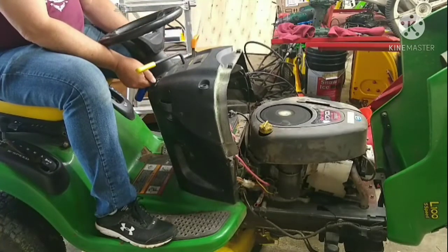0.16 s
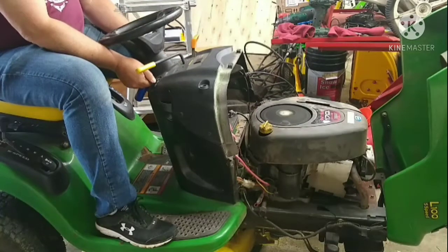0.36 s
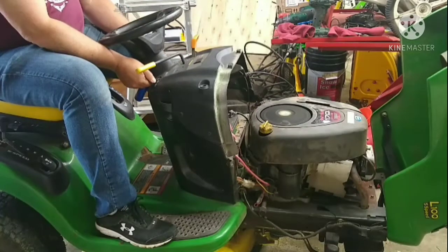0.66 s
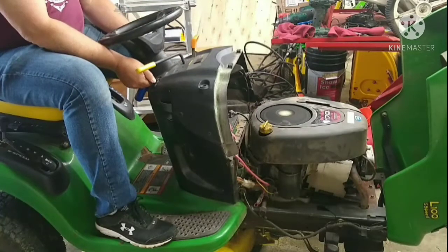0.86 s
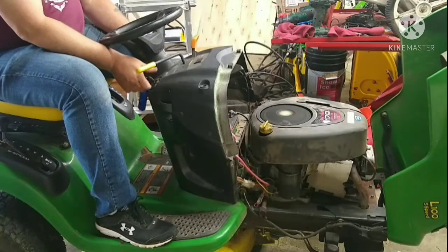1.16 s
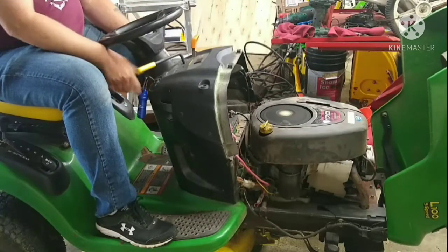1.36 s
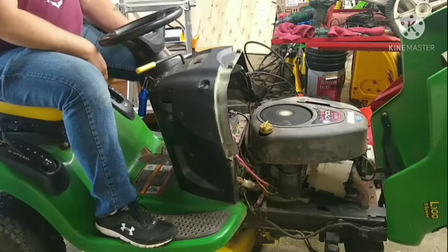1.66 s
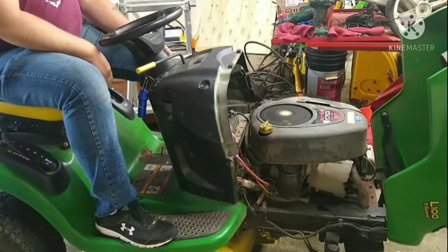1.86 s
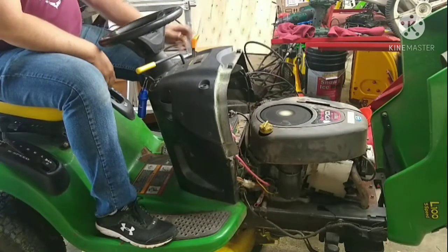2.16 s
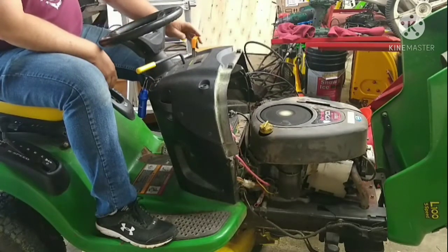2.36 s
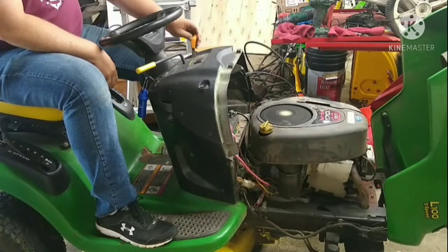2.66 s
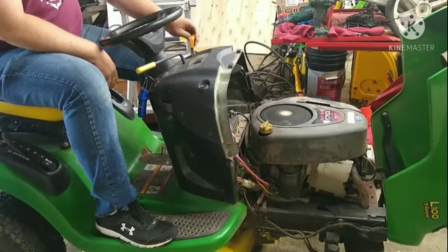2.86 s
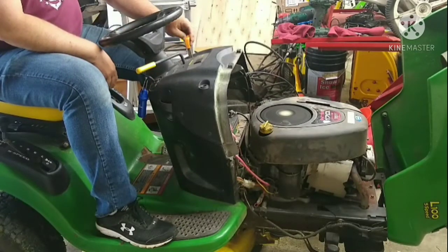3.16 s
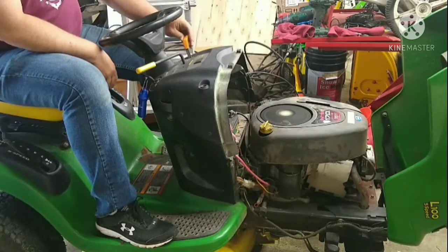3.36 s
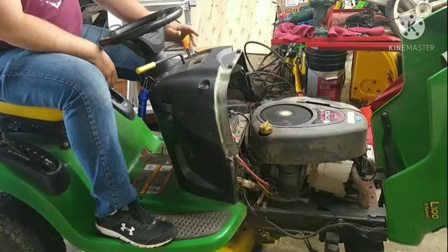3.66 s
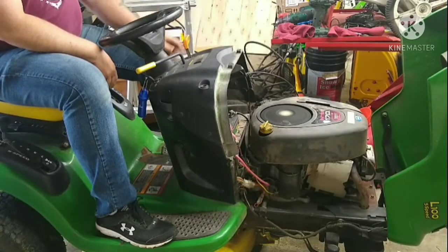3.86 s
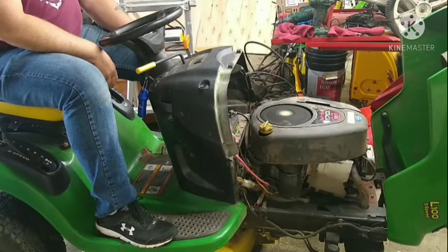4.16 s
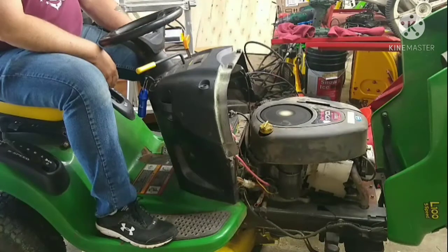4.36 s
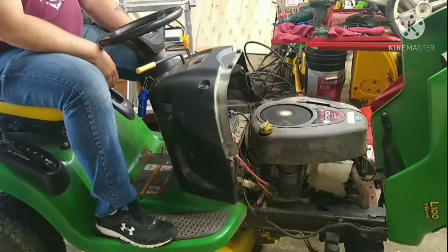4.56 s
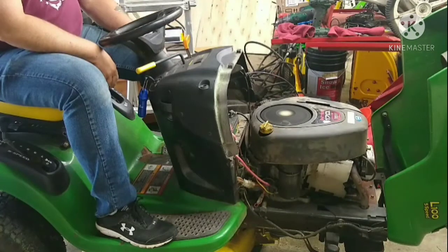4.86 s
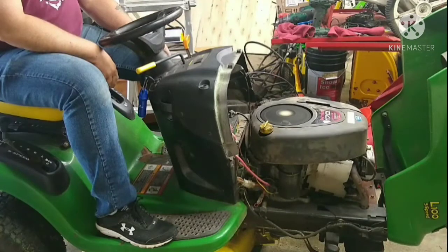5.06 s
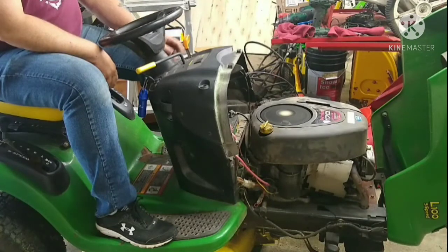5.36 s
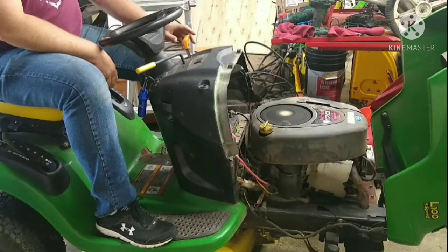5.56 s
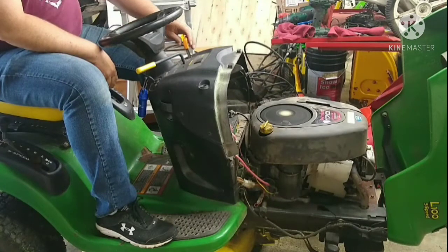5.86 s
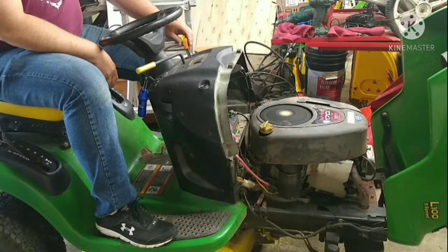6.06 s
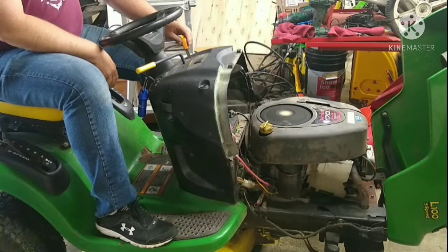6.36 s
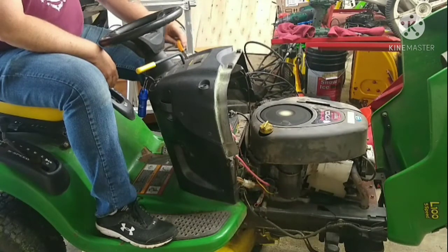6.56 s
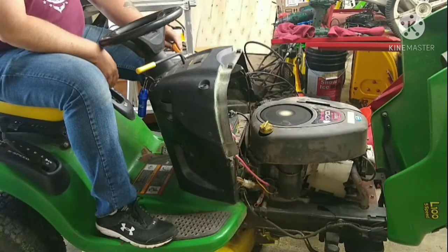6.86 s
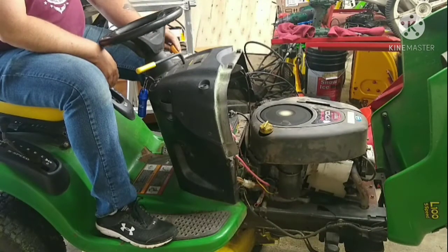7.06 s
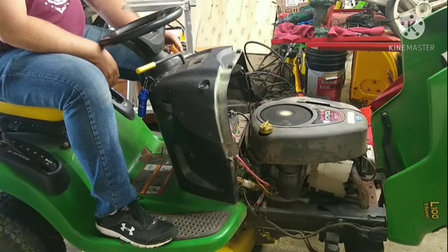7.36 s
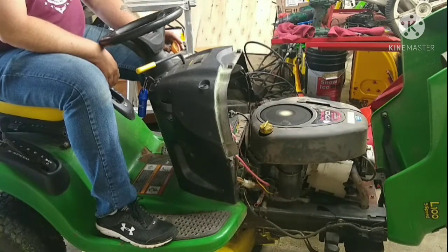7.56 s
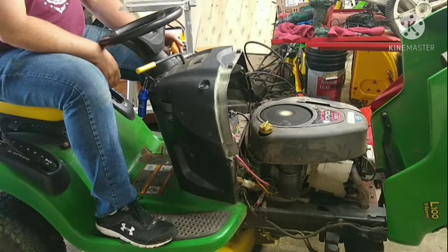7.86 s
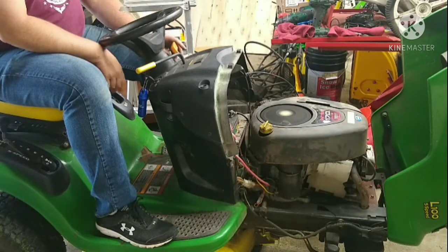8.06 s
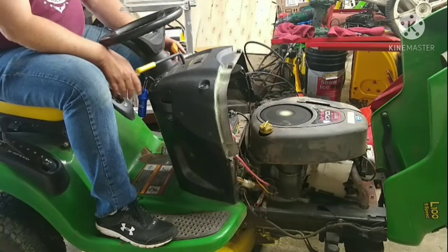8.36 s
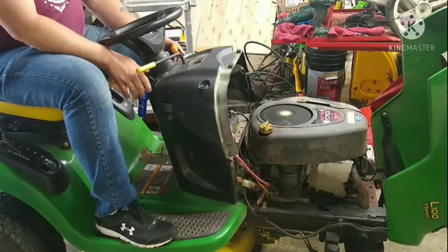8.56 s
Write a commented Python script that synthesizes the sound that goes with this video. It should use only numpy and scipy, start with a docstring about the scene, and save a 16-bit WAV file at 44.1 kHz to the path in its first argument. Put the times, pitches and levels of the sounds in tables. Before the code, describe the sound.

A riding mower's small petrol engine cranks with a whining, chugging starter, catches after a second, roars steadily, then eases down to a slower putter.

```python
"""A riding mower's single-cylinder four-stroke is cranked in a garage, catches, runs fast, is throttled back.
Starter noise, its tooth whine, intake gulps, hoots, puffs, bangs and chassis thumps make the start.
Firing pulses ring the muffler and the room; shaped noise makes cooling air, intake drone and exhaust hiss.
Sine multiples of the firing rate make the fan and crankshaft song; short ringing ticks make the tappets.
A phone close by picks it up with two microphones and widens the stereo image."""
import sys
import numpy as np
from scipy import signal
from scipy.fft import rfft, irfft, next_fast_len
from scipy.io import wavfile
from scipy.ndimage import map_coordinates

SR = 44100
rng = np.random.default_rng(int(sys.argv[2]) if len(sys.argv) > 2 else 0)


def digitize_waveform(pressure):
    """Quantize a signal to 16-bit integers and store it at the path in sys.argv[1].

    Rows of a 2-D input are taken as channels; values are limited to [-1, 1].
    """
    field = np.atleast_2d(pressure).T
    bounded = np.clip(field, -1, 1)
    quanta = np.round(bounded * 32767).astype(np.int16)
    wavfile.write(sys.argv[1], SR, quanta)


N = 384111
TIME = np.arange(N) / SR
SIZE = next_fast_len(N + SR // 2, real=True)
HZ = np.fft.rfftfreq(SIZE, 1 / SR)

# engine speed: (time [s], rate [firings/s])
SPEED = [(1.136, 13.0), (1.42, 24.77), (1.6, 25.5), (1.82, 25.24), (2.0, 25.3), (2.45, 25.0), (2.74, 25.14),
         (3.22, 25.08), (3.45, 25.84), (3.72, 26.32), (4.08, 26.28), (4.25, 25.96), (4.58, 26.29),
         (4.75, 25.91), (5.1, 26.27), (5.5, 26.1), (5.78, 25.38), (5.93, 25.68), (6.2, 25.6), (6.4, 25.76),
         (6.78, 25.69), (7.05, 23.68), (7.3, 22.28), (7.6, 21.1), (8.17, 19.99), (8.71, 19.8)]
# throttle: (time [s], opening [0-1])
THROTTLE = [(1.4, 0.89), (6.75, 0.89), (7.0, 0.47), (8.7, 0)]
# engine load: (time [s], load [0-1])
LOAD = [(1.5, 0.8), (3.3, 0.64), (3.65, 0.34), (5.65, 0.45), (5.95, 0.8), (6.6, 0.5), (6.95, 0)]
# intake strokes through the carburettor: (time [s], peak [dB], length [s], boom [Hz])
GULPS = [(.024, -17.5, 0.016, 424), (.219, -19.5, 0.013, 532), (.399, -16, 0.011, 466),
         (.566, -17, 0.015, 375), (.728, -14.5, 0.01, 363), (.889, -15.5, 0.012, 385),
         (1.013, -12, 0.0067, 540), (1.109, -14.5, 0.0049, 494), (1.157, -17, .002, 520),
                  (1.185, -13.5, 0.019, 415), (1.229, -19, .004, 402), (1.28, -18, 0.0079, 430),
         (1.333, -12.5, 0.0031, 445), (1.378, -11.5, 0.0078, 420), (1.415, -17, 0.0054, 400),
         (1.452, -25, 0.0033, 380), (1.488, -21, 0.0051, 380)]
# spits back through the carburettor with loss of power: (time [s], peak [dB], sag [dB])
STUMBLES = [(5.743, -12.5, 4), (6.563, -13, .5)]
# first firings: (time [s], peak [dB], 60 dB decay [s], muffler cut-off [Hz], exhaust puff [dB])
BANGS = [(.933, -23, 1.2, 130, -25.5), (1.014, -19, .18, 2500, -31.5)]

# resonances and hollows of muffler, chassis and garage: (frequency [Hz], width [Hz], gain [dB])
BODY_MODES = [(126.0, 12.0, 8.0), (176.0, 9.0, -9.0), (222.0, 16.0, 14.0), (228.0, 34.0, -11.0),
              (260.0, 27.0, 13.0), (306.0, 15.0, 9.0), (356.0, 40.0, 14.0), (426.0, 67.0, 14.0),
              (521.0, 28.0, 14.0), (571.0, 25.0, 11.0), (620.0, 14.0, 5.0), (639.0, 11.0, 9.0),
              (701.0, 70.0, 14.0), (820.0, 21.0, -8.0), (893.0, 60.0, 9.0), (911.0, 28.0, -12.0),
              (942.0, 15.0, 4.0), (999.0, 25.0, -12.0), (1005.0, 12.0, 14.0), (1031.0, 9.0, 6.0),
              (1070.0, 36.0, -7.0), (1210.0, 9.0, 5.0), (1246.0, 20.0, -6.0), (1469.0, 9.0, 4.0),
              (1569.0, 55.0, 7.0), (1624.0, 9.0, 5.0), (1678.0, 15.0, 4.0), (1855.0, 68.0, 8.0)]
# starter gear resonances: (frequency [Hz], width [Hz], gain [dB])
GEAR_MODES = [(696, 35, 7), (910, 170, 5), (1186, 110, 5.5), (2780, 670, -5.5), (5330, 300, 1.5)]
# intake air box resonances: (frequency [Hz], width [Hz], gain [dB])
AIRBOX_MODES = [(160, 45, 5), (385, 120, 10), (545, 60, 5)]
# fan shroud resonances: (frequency [Hz], width [Hz], gain [dB])
SHROUD_MODES = [(681, 77, 8), (1215, 110, 4.5), (3200, 2600, -1), (5720, 570, -5.5)]
# resonances that swell passing tones: (frequency [Hz], width [Hz], gain [dB])
TONE_MODES = [(326, 20, -34.5), (422, 121, -36.6), (526, 18, -28.2), (569, 33, -32.1), (639, 16, -27.9),
              (700, 47, -28.0), (743, 14, -30.2), (860, 48, -31.5), (892, 10, -32.5), (953, 17, -32.8),
              (1009, 23, -36.7), (1120, 53, -33.5), (1187, 22, -35.5), (1210, 6, -29.9), (1285, 20, -37)]

# firing spectrum: (frequency [Hz], relative level [dB/Hz])
FIRING_SPECTRUM = [(25, -72), (40, -60), (55, -38.5), (80, -47), (110, -30.5), (200, -39.5), (350, -47),
                   (700, -48.5), (1200, -38.5), (1500, -48.5), (2000, -50), (3200, -60), (4200, -67.5),
                   (6000, -67), (16000, -103)]
# cooling air spectrum: (frequency [Hz], relative level [dB/Hz])
RUSH_SPECTRUM = [(20, -26), (50, -7), (190, -11), (280, -1), (600, -1.5), (900, -1), (1700, -2), (2400, -6),
                 (4200, -13.5), (6500, -14.5), (8000, -24), (16000, -17)]
# exhaust hiss and valve spectrum: (frequency [Hz], relative level [dB/Hz])
HISS_SPECTRUM = [(500, -32), (2500, -1), (5000, 10.5), (8000, 0.5), (10000, 2.5), (12500, 2.5),
                 (15500, -14)]
# starter grind spectrum: (frequency [Hz], relative level [dB/Hz])
GRIND_SPECTRUM = [(25, -14), (60, 6), (150, -3), (270, 6), (800, -7), (1400, -3), (2200, -0.5),
                  (4200, -8.5), (6500, -13.5), (8000, -21), (16000, -19)]
# gulp spectrum: (frequency [Hz], relative level [dB/Hz])
GULP_SPECTRUM = [(40, -26), (130, 5), (400, -5.5), (650, -6), (1300, -19), (4000, -29), (16000, -62)]
# sharp puff spectrum: (frequency [Hz], relative level [dB/Hz])
PUFF_SPECTRUM = [(500, -30), (2500, -13), (4200, 9.5), (5500, 11), (8000, 4), (10000, 4.5), (12500, 7),
                 (15500, 1)]
# exhaust note change, throttle shut: (frequency [Hz], gain [dB])
SHUT_CHANGE = [(60, 1), (120, 3.5), (190, 12), (270, -4.5), (400, 3), (650, -4.5), (900, -1.5), (1180, -4),
               (1400, 0)]
# exhaust note change, no load: (frequency [Hz], gain [dB])
UNLOADED_CHANGE = [(60, 1.5), (125, -2.5), (175, -3), (260, 2), (380, -15), (550, 0), (1200, 3)]

# starter tooth tones: (multiple of mesh rate [-], level [dB])
WHINE = [(3, -43.5), (4, -42), (5, -40.5), (6, -47)]
# fan and crankshaft tones: (multiple of firing rate [-], level unloaded [dB], change at full load [dB])
TONES = [(14, 5, 4), (16, 2, -6), (17, -6, 9), (18, -3.1, 0), (20, -2, 0), (22, -3.2, 0), (24, -4.5, 0),
         (26, -6.5, 0), (27, -20, 19), (28, .5, 1), (30, -4.5, -4), (31, -3, -12), (32, -1.5, -2),
         (34, -4.5, 1), (35, -5, -18), (36, -.5, -6), (38, -6.2, 0), (39, -4, -12), (40, 4, -2),
         (41, -8, 22), (42, -3.5, -2), (44, -2, -2), (46, -1, 0), (48, 1.5, -13), (50, -1, -5),
         (51, -8, 18), (52, 0, -1), (56, -4, -6), (58, .5, -6), (60, 1, -10)]
# tappets: (phase [cycles], level [dB], scatter [dB], ring [Hz], ring width [Hz])
TAPPETS = [(.81, -38.5, 1.5, 3370, 600), (.04, -39, 2.5, 5450, 450)]
# tappet level change: (time [s], first tappet [dB], second tappet [dB])
TICKING = [(3.3, -5, -6), (5.7, -12, -7), (5.95, 0, -6), (6.7, -2.5, -8), (7.0, -8, -13)]

# path to the microphones: (frequency [Hz], direct delay [s], direct over reflected [dB])
ARRIVAL = [(200, .015, -2), (450, .015, -1), (620, .001, -3), (700, .001, 1), (900, .011, -8),
           (1500, .02, -10)]
# likeness of the two microphones: (frequency [Hz], correlation [0-1])
ALIKE = [(100, 0.97), (250, 1), (500, 0.74), (1000, 0.12), (1600, 0.059), (16000, 0.039)]
# stereo widening delay: (frequency [Hz], delay [s])
WIDEN_LAG = [(2200, .000452), (6700, .000447), (8800, .000457), (10700, .00047), (12600, .000477)]

# starter cycles: first start, settled length, extra length; share of the extra left each cycle
CRANK_START_S, CRANK_CYCLE_S, CRANK_SLOW_S, CRANK_SHRINK = -.061, .159, .051, .45
CRANK_CYCLES, RUN_UP_CYCLES = 6, 6
STARTER_DB, STARTER_SWING_DB, STARTER_PEAK_CYCLES = -27.5, 2, .185
MESH_HZ, MESH_SWING_SHARE, FREE_RISE_SHARE = 243, .032, .22
GULP_RISE_OVER_FALL, BOOM_POWER_SHARE = .6, .2
SPIT_S, SPIT_BOOM_HZ, SAG_S = .005, 430, .045  # SAG_S: time to the bottom of the sag
THUMP_PHASE_CYCLES, THUMP_DB, THUMP_HZ, THUMP_T60_S = .48, -22.5, 163.4, .27
HOOT_HZ, HOOT_LENGTH_S, HOOT_PHASE_CYCLES = 290, .015, .81
HOOT_DB, HOOT_FADE_DB = -16.5, .9  # first hoot; drop per cycle
HOOT_ARCH_SHARE = .04  # pitch drop one HOOT_LENGTH_S from the middle
CRANK_PUFF_DB, CRANK_PUFF_T60_S = -34, .18
RUN_UP_PUFF_DB, RUN_UP_PUFF_T60_S = -24.3, .11
STROKE_START_S = 1.136  # an exhaust stroke begins here
CLEAN_START_S, CLEAN_END_S = 1.42, 1.53  # the mixture begins to burn cleanly
NOTE_DB, NOTE_LOAD_DB = -20.5, 1  # unloaded; added at full load
RUSH_DB, RUSH_COLD_DB = -22, -7  # clean burning; change before it
INTAKE_DB, INTAKE_LOAD_DB = -45.5, 14  # unloaded; added at full load
HISS_DB, HISS_COLD_DB = -36.5, 6.5  # clean burning; change before it
TAPPET_T60_S = .073
TONE_WAVER_DB, THROB_ORDER, THROB_DEPTH = 1.0, 28, .65  # depth at full load
WALLS_ADVANCE_S, STROKE_ROOM_DB = .014, -10.5
TOP_HZ = 15600


def amp(db):
    """Decibels to gain."""
    return 10 ** (np.asarray(db) / 20)


def unit(x):
    """Scale to rms 1."""
    return x / np.sqrt(np.mean(x ** 2) + 1e-20)


def curves(rows):
    """One value per sample for each column after the time."""
    time_s, *columns = np.transpose(rows)
    return [np.interp(TIME, time_s, column) for column in columns]


def ramp(start_s, end_s):
    """Rise from 0 to 1 between two times."""
    return np.clip((TIME - start_s) / max(end_s - start_s, 1 / SR), 0, 1)


def along(points):
    """(frequency [Hz], value) points joined on a log frequency axis."""
    hz, value = np.transpose(points)
    return np.interp(np.log(HZ + 1), np.log(hz), value)


def peak(hz, width_hz):
    """Resonance curve of height 1."""
    return 1 / (1 + (2 * (HZ - hz) / width_hz) ** 2)


def colour(spectrum, resonances=()):
    """Gain of a smooth spectrum with resonant peaks and hollows."""
    return amp(along(spectrum) + sum(db * peak(hz, width_hz) for hz, width_hz, db in resonances))


def filtered(x, response):
    """x through a frequency response."""
    return irfft(rfft(x, SIZE) * response, SIZE)[..., :N]


def wobble(rate_hz):
    """Smooth random curve with rate_hz knots a second."""
    knots = rng.standard_normal(int(N * rate_hz / SR) + 4)
    return map_coordinates(knots, [TIME * rate_hz])


def spread(source, response):
    """Coloured microphone pair of rms 1, most alike in the bass."""
    turn = np.arccos(np.clip(along(ALIKE), -1, 1)) / 2
    mid, side = filtered(source, response * np.array([np.cos(turn), np.sin(turn)]))
    return unit(np.array([mid + side, mid - side]))


def noise(response):
    """Steady coloured noise at both microphones."""
    return spread(rng.standard_normal((2, N)), response)


def echoes(t60_s, hold_s=0):
    """Frequency responses of two random tails that hold, then decay."""
    t = TIME[:SR // 2]
    tail = rng.standard_normal((2, len(t))) * amp(-60 * np.maximum(t - hold_s, 0) / t60_s)
    return rfft(tail / np.linalg.norm(tail[0]), SIZE)


def stroke(cycle, start, decay, scatter_db):
    """Burst once per engine cycle, each of its own size; start and decay in cycles."""
    elapsed = cycle - cycle[0] + cycle[0] % 1 + 1 - start
    count, age = np.divmod(elapsed, 1)
    size = amp(scatter_db * rng.standard_normal(400))
    return size[count.astype(int)] * (1 - np.exp(-age / .015)) * np.exp(-age / decay)


def burst(at_s, t60_s):
    """Envelope with a 3 ms rise and an exponential decay."""
    return ramp(at_s - .002, at_s + .0011) * amp(-60 * np.abs(TIME - at_s) / t60_s)


def sag_db():
    """Power drops after each stumble and comes back."""
    total_db = np.zeros(N)
    for at_s, _, depth_db in STUMBLES:
        age = np.maximum(TIME - at_s, 0) / SAG_S
        total_db -= depth_db * age * np.exp(1 - age)
    return total_db


def cranking(phase):
    """Times of a given phase in the cycles turned by the starter, which begin slow and settle."""
    lengths_s = CRANK_CYCLE_S + CRANK_SLOW_S * CRANK_SHRINK ** np.arange(CRANK_CYCLES)
    return CRANK_START_S + np.cumsum(lengths_s) - (1 - phase) * lengths_s


def labour():
    """Starter swing, +1 at its peak in each cranked cycle and -1 halfway between."""
    peaks_s = cranking(STARTER_PEAK_CYCLES)
    return np.cos(2 * np.pi * np.interp(TIME, peaks_s, np.arange(len(peaks_s))))


def starter():
    """Gear noise swings with each compression and drops out as the engine catches."""
    grind = amp(STARTER_DB + STARTER_SWING_DB * labour() + 1.95 * wobble(260))
    return grind * (1 - ramp(1.13, 1.36)) * noise(colour(GRIND_SPECTRUM, GEAR_MODES))


def whine():
    """Starter teeth sing in arcs, slower and weaker at each compression, rising as the engine takes the load."""
    swing = labour()
    mesh_hz = MESH_HZ * (1 + MESH_SWING_SHARE * swing + FREE_RISE_SHARE * ramp(1.0, 1.3))
    mesh = np.cumsum(mesh_hz) / SR
    teeth = np.zeros(N)
    for order, db in WHINE:
        level = amp(db + 2 * swing + 3 * wobble(35))
        teeth += level * np.sin(2 * np.pi * order * mesh + 1.2 * wobble(90))
    return np.sqrt(2) * teeth * (1 - ramp(.84, 1.4))


def gulps():
    """Intake strokes and spits sound the air box; the slower the stroke, the deeper its noise reaches."""
    spits = [(at_s, db, SPIT_S, SPIT_BOOM_HZ) for at_s, db, _ in STUMBLES]
    out, draught = np.zeros((2, N)), noise(colour(GULP_SPECTRUM, AIRBOX_MODES))
    for at_s, db, length_s, boom_hz in list(GULPS) + spits:
        span = slice(max(int((at_s - .07) * SR), 0), int((at_s + .07) * SR))
        age_s = TIME[span] - at_s
        fall_s = length_s * 2 / (1 + GULP_RISE_OVER_FALL)
        rise_s = fall_s * GULP_RISE_OVER_FALL
        swell = np.exp(-np.abs(age_s) / np.where(age_s < 0, rise_s, fall_s))
        cut_hz = np.clip(1.6 / length_s, 40, 500)
        bass_cut = signal.butter(2, cut_hz, "high", fs=SR, output="sos")
        suck = unit(swell * signal.sosfilt(bass_cut, draught[:, span]))
        boom = unit(swell * np.sin(2 * np.pi * boom_hz * age_s))
        gulp = unit(np.sqrt(1 - BOOM_POWER_SHARE) * suck + np.sqrt(BOOM_POWER_SHARE) * boom)
        out[:, span] += amp(db) * gulp * np.sqrt(np.mean(swell ** 2))
    return out


def thumps():
    """The piston's slow strokes rock the chassis, which rings low and dies away."""
    ages_s = np.maximum(TIME - cranking(THUMP_PHASE_CYCLES)[:, None], 0)
    envelopes = (1 - np.exp(-ages_s / .004)) * amp(-60 * ages_s / THUMP_T60_S)
    rings = envelopes * np.sin(2 * np.pi * THUMP_HZ * ages_s)
    return amp(THUMP_DB) * rings.sum(0)


def hoots():
    """The muffler hoots as the exhaust valve opens; the pitch arches and each hoot is weaker."""
    out = np.zeros(N)
    for k, at_s in enumerate(cranking(HOOT_PHASE_CYCLES)[:-1]):
        age_s = TIME - at_s
        flank = (age_s / HOOT_LENGTH_S) ** 2
        turns = HOOT_HZ * age_s * (1 - HOOT_ARCH_SHARE * flank / 3)
        out += amp(HOOT_DB - HOOT_FADE_DB * k) * np.exp(-flank) * np.sin(2 * np.pi * turns)
    return out


def puffs(cycle):
    """Sharp bursts of exhaust noise on cranked strokes, first firings and run-up strokes."""
    events = [(at_s, CRANK_PUFF_DB, CRANK_PUFF_T60_S) for at_s in cranking(0)[1:]]
    events += [(at_s, puff_db, CRANK_PUFF_T60_S) for at_s, *_, puff_db in BANGS]
    run_up_s = np.interp(np.arange(RUN_UP_CYCLES), cycle, TIME)
    events += [(at_s, RUN_UP_PUFF_DB, RUN_UP_PUFF_T60_S) for at_s in run_up_s]
    level = sum(amp(db) * burst(at_s, t60_s) for at_s, db, t60_s in events)
    return level * noise(colour(PUFF_SPECTRUM))


def bangs():
    """First firings are decaying noise bursts, low-passed by the muffler."""
    out = np.zeros((2, N))
    for at_s, db, t60_s, cutoff_hz, _ in BANGS:
        muffled = colour([(30, -28), (90, 5)]) / (1 + (HZ / cutoff_hz) ** 2)
        out += amp(db) * burst(at_s, t60_s) * noise(muffled)
    return out


def garage():
    """Phase of direct sound, delayed by register, plus reflections that fill the cycle."""
    hz, delay_s, direct_db = np.transpose(ARRIVAL)
    lag = 2 * np.pi * np.cumsum(along(np.c_[hz, delay_s])) * HZ[1]  # integral of group delay
    direct = amp(along(np.c_[hz, direct_db])) * np.exp(-1j * lag)
    reflected = echoes(t60_s=.12, hold_s=.034) * np.exp(2j * np.pi * HZ * WALLS_ADVANCE_S)
    return np.exp(1j * np.angle([direct + reflected[0], reflected[1]]))


def exhaust(cycle, walls):
    """One pressure pulse per firing, rung by the body, smeared by the walls, recoloured by load and throttle."""
    times_s = np.interp(np.arange(1, int(cycle[-1]) + 1), cycle, TIME)
    late, size = rng.standard_normal((len(times_s), 2)).T
    at = np.clip((times_s + 1e-5 * late) * SR, 0, N - 1)
    pulses = np.bincount(np.round(at).astype(int), amp(.45 * size), N)
    note = spread(pulses, colour(FIRING_SPECTRUM, BODY_MODES) * walls)
    (throttle,), (load,) = curves(THROTTLE), curves(LOAD)
    note = load * note + (1 - load) * filtered(note, colour(UNLOADED_CHANGE))
    note = throttle * note + (1 - throttle) * filtered(note, colour(SHUT_CHANGE))
    return amp(NOTE_DB + NOTE_LOAD_DB * load + sag_db()) * note


def tappets(cycle):
    """Each tappet ticks once per cycle with its own short ring and uneven strength."""
    out = np.zeros((2, N))
    for (phase, db, scatter_db, hz, width_hz), level_db in zip(TAPPETS, curves(TICKING)):
        times_s = np.interp(np.arange(1, int(cycle[-1])) + phase, cycle, TIME)
        sizes = amp(scatter_db * rng.standard_normal(len(times_s)))
        taps = np.bincount(np.round(times_s * SR).astype(int), sizes, N)
        resonance = HZ * width_hz / (hz ** 2 - HZ ** 2 + 1j * HZ * width_hz)
        out += amp(db + level_db) * spread(taps, echoes(t60_s=TAPPET_T60_S) * resonance)
    return ramp(1.16, 1.5) * out


def air(cycle):
    """Cooling air rushes through the shroud, surging off load; the intake drones once per cycle, louder on load."""
    load, = curves(LOAD)
    suck = unit(stroke(cycle, start=.33, decay=.35, scatter_db=1.5))
    rush_db = RUSH_DB + RUSH_COLD_DB * (1 - ramp(CLEAN_START_S, CLEAN_END_S)) + sag_db() / 2
    surge = unit(5 + (1 - load) * suck)
    rush = amp(rush_db) * surge * noise(colour(RUSH_SPECTRUM, SHROUD_MODES))
    drone_spectrum = [(150, -8), (330, -13.5), (600, -32.0), (3000, -26.5)]
    drone = amp(INTAKE_DB + INTAKE_LOAD_DB * load) * suck * noise(colour(drone_spectrum, AIRBOX_MODES))
    return rush + drone


def tones(cycle, walls):
    """Fan and crankshaft sing multiples of the speed, swelling at resonances; one throbs under load."""
    (speed,), (load,) = curves(SPEED), curves(LOAD)
    gain = sum(amp(db) * peak(hz, width_hz) for hz, width_hz, db in TONE_MODES)
    turn = np.unwrap(np.angle(walls[0]))
    throb = 1 + THROB_DEPTH * load * np.cos(2 * np.pi * cycle)
    song = np.zeros(N)
    for order, db, load_db in TONES:
        tone_hz = order * speed
        tone = np.sin(2 * np.pi * order * cycle + np.interp(tone_hz, HZ, turn))
        tone *= np.interp(tone_hz, HZ, gain)
        if order == THROB_ORDER:
            tone *= throb
        song += amp(db + load_db * load + TONE_WAVER_DB * wobble(10)) * tone
    return np.sqrt(2) * amp(sag_db()) * song


def clatter(cycle):
    """Exhaust spits harder with an open throttle; valve gear rattles a third of a cycle later."""
    throttle, = curves(THROTTLE)
    spit = throttle ** 2 * stroke(cycle, start=.975, decay=.36, scatter_db=1.4)
    valves = (1.1 - .7 * throttle) * stroke(cycle, start=.32, decay=.2, scatter_db=1.8)
    seating = .28 * stroke(cycle, start=.53, decay=.15, scatter_db=2)
    level = unit(np.sqrt(.03 + spit ** 2 + valves ** 2 + seating ** 2))
    hiss_db = HISS_DB + HISS_COLD_DB * (1 - ramp(CLEAN_START_S, CLEAN_END_S)) + sag_db()
    return amp(hiss_db) * ramp(1.43, 1.44) * level * noise(colour(HISS_SPECTRUM))


def scene():
    """Crankshaft angle times the running engine; starter cycles time the cranking."""
    cycle = np.cumsum(curves(SPEED)[0]) / SR
    cycle -= np.interp(STROKE_START_S, TIME, cycle)  # whole numbers = start of an exhaust stroke
    cycle += .002 * wobble(8)  # slight random timing wander
    walls = garage()
    strokes = gulps() + hoots() + puffs(cycle) + bangs()
    room = amp(STROKE_ROOM_DB) * filtered(strokes, echoes(t60_s=.6)[0])
    start = starter() + whine() + strokes + room + thumps()
    running = ramp(.98, 1.43) * exhaust(cycle, walls) + tappets(cycle)
    running += ramp(1.25, 1.25) * air(cycle)  # steps in
    running += ramp(1.33, 1.58) * tones(cycle, walls) + clatter(cycle)
    return start + running


def record(dry):
    """Microphones differ in tone; widening subtracts each side, delayed, from the other; peaks are rounded."""
    lean_db = along([(200, 1), (1000, 1.0), (3000, 3.0), (10000, -2.5), (15000, -2.5)])
    mics = filtered(dry, amp([-lean_db, lean_db]))
    cross = along([(100, .76), (1000, 1.0), (4500, .69), (10500, .46), (15000, .11)])
    delay = np.exp(-2j * np.pi * HZ * along(WIDEN_LAG))
    wide = mics - filtered(mics[::-1], cross * delay)
    balance_db = along([(100, 2.5), (450, -1.7), (1200, .87), (10000, .5), (14500, -5.0)])
    out = filtered(wide, amp([balance_db, -balance_db]))
    out = out / (1 + np.abs(out / .92) ** 8) ** (1 / 8)
    return filtered(out, HZ < TOP_HZ)


dry = scene()
out = record(dry)
digitize_waveform(out)
```